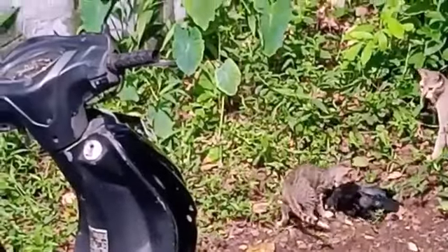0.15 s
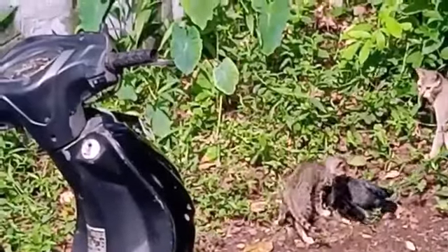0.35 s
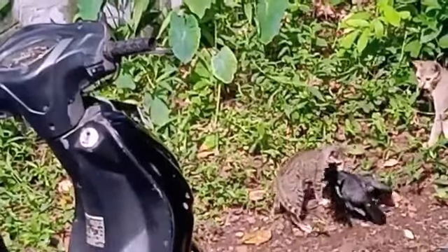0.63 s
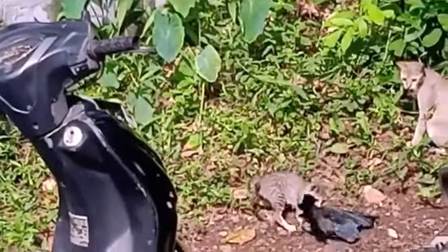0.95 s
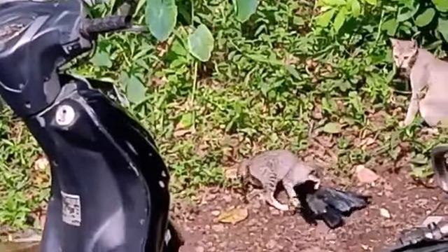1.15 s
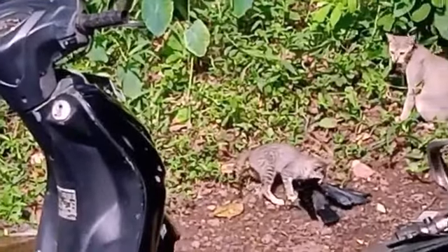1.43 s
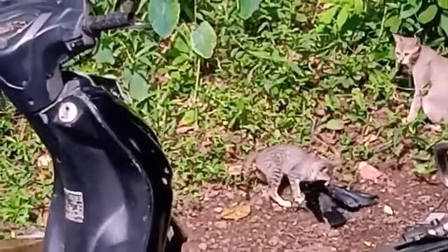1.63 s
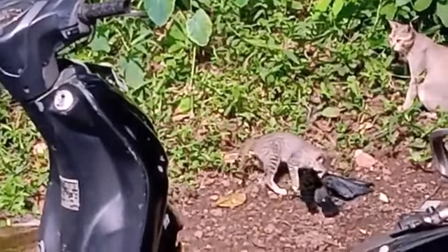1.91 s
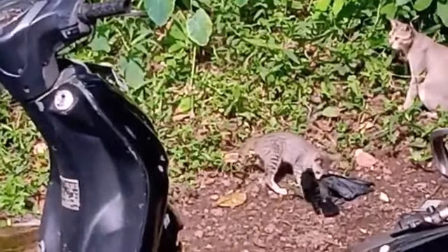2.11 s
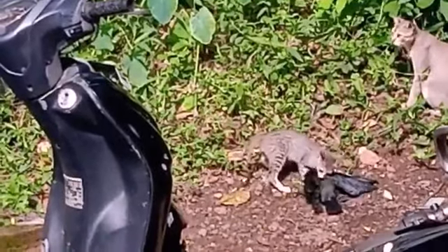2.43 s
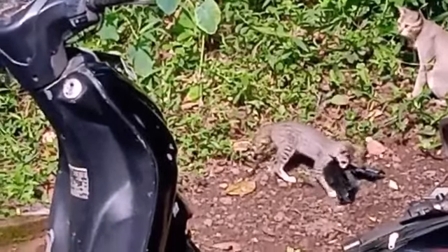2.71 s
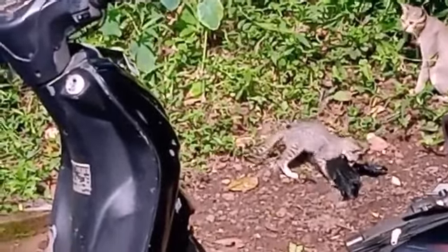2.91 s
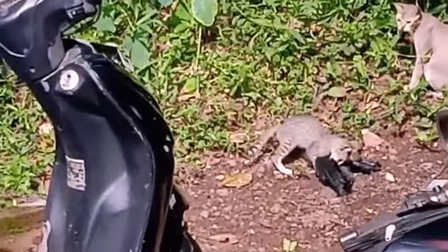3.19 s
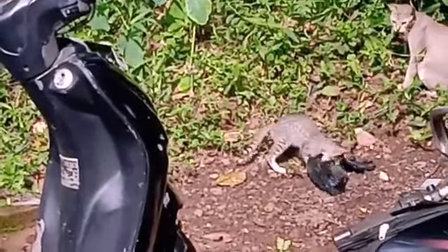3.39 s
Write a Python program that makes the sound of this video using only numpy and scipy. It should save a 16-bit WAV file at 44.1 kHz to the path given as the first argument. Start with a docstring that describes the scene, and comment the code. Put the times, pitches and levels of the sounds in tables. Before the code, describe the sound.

A mob of crows caws in a dense, raucous, overlapping clamor around an open yard.

```python
"""First a hoarse caw, already under way, then more: a mob of crows in the trees over a yard, heard on a phone.
Near caws are rattling pulse trains and breath through throat and beak; a far flock of like voices lies behind.
A dove coos faintly as wavering sine tones. Filtered noise makes street murmur and breeze, short wavering
sines the wind thumps on the microphone. Thin treble noise follows the din, its bands flickering.
"""
import sys
import numpy as np
from scipy import signal
from scipy.fft import rfft, irfft
from scipy.io import wavfile
from scipy.ndimage import uniform_filter1d, map_coordinates

SR = 44100
rng = np.random.default_rng(int(sys.argv[2]) if len(sys.argv) > 2 else 0)


def invert_db(level):
    """Linear amplitude ratio for a level in decibels (20 dB per decade), elementwise."""
    return 10 ** (np.asarray(level, dtype=float) / 20)


def master(y):
    """Save y as 16-bit WAV."""
    cut = np.clip(np.atleast_2d(y).T, -1, 1)
    pcm = np.round(cut * 32767)  # scale
    wavfile.write(sys.argv[1], SR, pcm.astype(np.int16))


N = 156555  # samples

# distant street murmur, spectrum: (f/Hz, level/dB)
MURMUR_SPECTRUM = [(71, -30), (120, -26), (204, -16.5), (414, -3), (534, -17.5), (590, -7), (900, -1),
                   (1170, -44), (1980, -120)]
# distant street murmur over time, before MURMUR_GAIN_DB and random swells: (t/s, level/dB)
MURMUR_LEVEL = [(0.0, -76), (0.49, -72), (0.67, -80.5), (1.17, -73), (1.21, -79), (1.4, -76), (1.42, -76),
                (1.88, -74), (2.0, -88), (2.13, -74), (2.72, -80), (2.88, -73.5), (3.492, -79), (3.55, -75)]
# breeze at the microphone, spectrum: (f/Hz, level/dB)
BREEZE_SPECTRUM = [(20, -36), (40, -14), (60, -15.5), (92, -1.5), (108, -1), (182, -14.5), (250, -16),
                   (320, -80), (550, -120)]
# breeze over time, before random gusts: (t/s, level/dB)
BREEZE_LEVEL = [(0.0, -80), (0.19, -76), (0.54, -91), (0.72, -89), (0.92, -82), (1.22, -79), (1.3, -80),
                (1.62, -75), (1.91, -79), (2.16, -77), (2.62, -74), (2.78, -73), (3.01, -74.5), (3.55, -77)]
# wind thumps on the microphone: (peak time t/s, peak level/dB, mean pitch f/Hz)
THUMPS = [(0.071, -67, 96), (0.29, -71, 110), (0.727, -64, 93), (0.858, -61, 78), (1.196, -58.5, 105),
          (1.309, -89, 118), (1.374, -60, 325), (1.409, -69, 295), (1.429, -65, 149), (1.498, -60, 160),
          (1.879, -76, 155), (2.009, -72, 94), (2.108, -62, 108), (2.148, -57, 114), (2.2, -48.5, 90),
          (2.336, -57, 83), (2.679, -66, 105), (2.78, -72, 71), (2.881, -71, 65), (2.979, -59, 81.7),
          (3.101, -69, 85), (3.237, -66.5, 83), (3.321, -71.5, 89), (3.42, -71, 78)]
# thin flickering treble, spectrum: (f/Hz, level/dB)
SIZZLE_SPECTRUM = [(7800, -13), (8200, -2), (9400, -1.5), (11500, -5), (12300, -13), (13400, -26),
                   (14800, -3.5), (15700, -14)]
# dove coos, before random level changes: (start t/s, length t/s, peak level/dB, mean pitch f/Hz)
COOS = [(0.085, 0.51, -66.5, 405), (2.658, 0.21, -65.5, 421)]
# the far flock over time, before the yard's echoes: (t/s, level/dB)
FLOCK_LEVEL = [(0, -38), (0.821, -40), (1.1, -42.5), (2.0, -40.5), (2.96, -45), (3.55, -43)]
# near caws: (start t/s, length t/s, level/dB before swell and echoes, pitch f/Hz at the middle,
# glide/share of pitch each side of the middle, throat f/Hz, upper throat f/Hz (both at the middle),
# treble level/dB before a common lift, roughness/0-1)
NEAR_CAWS = [(-.2, 0.33, -41.5, 475.4, 0.0095, 1920, 4520, -1, 0.42),
             (0.101, 0.31, -44.5, 460.6, .02, 1580, 4370, 7.5, 0.23),
             (.1, 0.32, -43.5, 536.7, -0.0046, 1780, 4640, 7, 0.45),
             (0.101, 0.23, -45.5, 483, 0.026, 2090, 4700, -4, 0.25),
             (0.201, 0.15, -36, 515, .03, 2040, 4500, -16, 0.21),
             (0.356, 0.3, -54, 495, -0.0039, 1990, 4200, -6, 0.26),
             (.58, 0.27, -37, 481.2, 0.019, 1800, 4550, 1, 0.35),
             (0.615, 0.28, -51.5, 474, .01, 1420, 4600, -30, 0.3),
             (0.66, 0.43, -43, 518, 0.0016, 1930, 4810, 2.5, 0.28),
             (1.06, 0.28, -45, 540, -0.028, 1600, 4330, -6, 0.2),
             (1.239, 0.33, -37.5, 485.2, -0.0097, 1746, 4540, 2, 0.48),
             (1.297, 0.31, -46, 437.7, .01, 1570, 4570, 5.5, 0.37),
             (1.619, 0.23, -41.5, 519.7, -0.011, 1654, 4660, -1.5, 0.28),
             (1.661, 0.32, -42, 514.7, -0.01, 2090, 4760, -6, 0.22),
             (1.72, 0.31, -41, 477.3, -0.006, 2025, 4460, 1.5, 0.32),
             (1.937, 0.26, -47, 456.6, -0.013, 1410, 4700, 12.5, 0.12),
             (1.95, 0.257, -44.5, 432, -0.0054, 1740, 4330, 0, 0.28),
             (2.271, 0.32, -41.5, 475.2, -0.024, 1776, 4200, -5.5, 0.35),
             (2.519, 0.26, -44, 497.4, -0.017, 2065, 4300, 2, 0.4),
             (2.46, 0.31, -52.5, 489, 0, 1500, 4700, 13, 0.08),
             (2.737, 0.18, -42.5, 497, 0, 2010, 4300, -1, 0.28),
             (2.856, 0.24, -49.5, 494, -.02, 2100, 4840, -9, 0.39),
             (3.121, 0.28, -41.5, 477, -0.024, 1885, 4500, 3, 0.25),
             (3.059, 0.28, -48.5, 481, -.015, 1450, 4550, -1.5, 0.18),
             (3.357, 0.29, -46.5, 505, .02, 2170, 4340, 3.5, 0.56)]
# throat, beak and microphone together: (f/Hz, level/dB)
VOICE_SPECTRUM = [(150, -80), (290, -48), (500, -35.5), (680, -22.5), (800, -10.5), (960, -11),
                  (1240, -7.5), (1400, -7), (1750, -2.5), (2080, -4.5), (2250, -7), (2550, -17),
                  (2950, -23.5), (3550, -30.5), (3900, -26.5), (4200, -26), (5320, -25), (6060, -26),
                  (7310, -26.5), (7700, -32.5), (8100, -75)]
# what differs between the microphone ports, before random level changes: (f/Hz, level/dB)
PORT_SPECTRUM = [(60, -23), (110, -23), (200, -16), (380, -27.5), (700, -26.5), (1290, -30), (2380, -28.5),
                 (4400, -23), (8120, -20.5), (15000, -18)]

MURMUR_GAIN_DB = 9  # whole band over its lower part
THUMP_S = 0.013  # from the peak to 1/e
SIZZLE_DB, SIZZLE_BAND_HZ, DROPOUT_DB, DROPOUT_BIAS = -68, 250, -40, .3
TOP_FLICKER_HZ, TOP_FADE_PER_S = 11900, .3  # above this, bands drop out together, ever more often
ATTACK_S, RELEASE_S = 0.056, 0.063
PITCH_SAG, JITTER = .05, .025  # shares of pitch: sag at both ends; fast jitter at full roughness
RATTLE_HZ, RATTLE_DEPTH = 80, .55  # mean rate
THROAT_WIDTH_HZ, THROAT_DB = 240, 13
UPPER_WIDTH_HZ, UPPER_DB = 130, 16
BEAK_HZ, BEAK_WIDTH_HZ, BEAK_DB = 6140, 570, 0
TREBLE_HZ = 3300  # crossover between the low and the high part of the voice
FLOCK_PER_S, FLOCK_SPREAD_DB = 24, 3.5  # spread each way
FLOCK_BLUR_DB = -6  # far throats ring less sharply
YARD_T60_S, YARD_DB, FLOCK_YARD_DB = 0.63, -7.5, 1.5  # echoes relative to direct sound
PORT_SMEAR_S = .08  # T60
TOP_HZ = 15700


def level(x, db):
    """Set the rms level in dB."""
    return x * invert_db(db) / np.sqrt(np.mean(x ** 2))


def colour(x, points):
    """Filter by a (f/Hz, level/dB) curve, straight over log frequency."""
    hz = np.maximum(np.arange(len(x) // 2 + 1) * SR / len(x), 1)
    point_hz, point_db = np.transpose(points)
    gain = invert_db(np.interp(np.log(hz), np.log(point_hz), point_db))
    return irfft(rfft(x) * gain, len(x))


def over_time(points):
    """Join (t/s, level/dB) points by straight lines, in dB."""
    point_s, point_db = np.transpose(points)
    return np.interp(np.arange(N) / SR, point_s, point_db)


def walk(rate, n=N):
    """Random levels held 1 / rate s and slewed twice; spread near 1."""
    hold = max(int(SR / rate), 1)
    steps = np.repeat(rng.standard_normal(n // hold + 1), hold)
    return 1.3 * uniform_filter1d(uniform_filter1d(steps, hold), hold)[:n]


def add(out, x, start):
    """Mix x in at start seconds, trimmed to the scene."""
    i = int(start * SR)
    a, b = max(i, 0), min(i + len(x), N)
    if b > a:
        out[a:b] += x[a - i:b - i]


def swell(t, length):
    """Gain of one call as it rises and dies away."""
    return np.clip(np.minimum(t / ATTACK_S, (length - t) / RELEASE_S), 0, 1) ** 2


def echoes(x, t60_s):
    """Scattered reflections: a decaying noise tail with unit energy."""
    t = np.arange(SR // 2) / SR
    tail = rng.standard_normal(len(t)) * np.exp(-np.log(1000) * t / t60_s)
    return signal.fftconvolve(x, tail / np.sqrt(np.sum(tail ** 2)))[:N]


def yard(x, db):
    """Echoes of trees and walls beside the direct sound, scaled to keep the power."""
    return (x + invert_db(db) * echoes(x, YARD_T60_S)) / np.sqrt(1 + invert_db(db) ** 2)


def street_murmur():
    """Distant, patchy murmur: low-passed noise whose level wanders."""
    noise = level(colour(rng.standard_normal(N), MURMUR_SPECTRUM), MURMUR_GAIN_DB)
    return noise * invert_db(over_time(MURMUR_LEVEL) + 3.6 * walk(15))


def breeze():
    """Fitful wind at the microphone: very low noise in gusts."""
    noise = level(colour(rng.standard_normal(N), BREEZE_SPECTRUM), 0)
    return noise * invert_db(over_time(BREEZE_LEVEL) + 4.5 * walk(25))


def wind_thumps():
    """Single thumps of wind on the microphone: wavering sines in short bell-shaped bursts."""
    out = np.zeros(N)
    t = np.arange(SR // 5) / SR
    bell = np.exp(-(t / THUMP_S - 2) ** 2)
    for start, db, hz in THUMPS:
        turns = np.cumsum(hz * (1 + .1 * walk(60, len(t)))) / SR + rng.random()
        add(out, invert_db(db) * bell * np.sin(2 * np.pi * turns), start - 2 * THUMP_S)
    return out


def sizzle(crows):
    """Narrow treble bands follow the din and drop out briefly, the lower ones each by itself."""
    out = np.zeros(N)
    din = np.sqrt(uniform_filter1d(crows ** 2, SR // 10) + 1e-12)
    together = walk(28)
    fade = TOP_FADE_PER_S * np.arange(N) / SR
    for hz in np.arange(7800, TOP_HZ, SIZZLE_BAND_HZ):
        end_hz = hz + SIZZLE_BAND_HZ
        edges = [(hz - 30, -90), (hz, 0), (end_hz, 0), (end_hz + 30, -90)]
        band = colour(rng.standard_normal(N), edges)
        if hz < TOP_FLICKER_HZ:
            chance = walk(25)
        else:
            chance = together + .4 * walk(25) + fade
        dropout = np.clip(3 * (chance - DROPOUT_BIAS), 0, 1)
        out += band * invert_db(DROPOUT_DB * dropout)
    return level(colour(out, SIZZLE_SPECTRUM) * din ** 1.13, SIZZLE_DB)


def dove():
    """Soft, faint coos: sine tones that waver in pitch and level."""
    out = np.zeros(N)
    t = np.arange(SR // 2) / SR
    for start, length, db, hz in COOS:
        tone = np.sin(2 * np.pi * np.cumsum(hz * (1 + .015 * walk(30, len(t)))) / SR)
        add(out, invert_db(db + 3 * walk(30, len(t))) * tone * swell(t, length), start)
    return out


def resonance(f, centre_hz, width_hz):
    """Power-shaped peak of unit height; width at half height."""
    return 1 / (1 + (2 * (f - centre_hz) / width_hz) ** 2)


def voice_source(n, pitch_hz, rough):
    """Uneven pulses of 30 harmonics, mixed with breath noise gated by the same cycle."""
    wander = JITTER * rough * walk(400, n) + .016 * walk(30, n)
    phase = 2 * np.pi * np.cumsum(pitch_hz * (1 + wander)) / SR
    k = np.arange(1, 31)[:, None]
    pulses = level(np.cos(k * phase + 0.1511 * k ** 2).sum(axis=0), 0)
    hiss = level(rng.standard_normal(n) * (1 + 0.51 * np.cos(phase)), 0)
    return np.sqrt(1 - rough) * pulses + np.sqrt(rough) * hiss


def throat_rattle(n):
    """Slow, uneven beating of the voice's loudness."""
    rate = RATTLE_HZ * (1 + 0.159 * rng.standard_normal() + .12 * walk(61.4, n))
    return 1 + RATTLE_DEPTH * np.cos(2 * np.pi * np.cumsum(rate) / SR)


def caw(length, db, pitch_hz, glide, throat_hz, upper_hz, treble_db, rough, blur_db=0):
    """Rattling pulses and breath ring the throat and beak; pitch and resonances arch together."""
    n = 20480
    t = np.arange(n) / SR
    source, rattle = voice_source(n, pitch_hz, rough), throat_rattle(n)
    f = np.arange(1, n // 2 + 2) * SR / n
    throat = invert_db(THROAT_DB + blur_db) * resonance(f, throat_hz, THROAT_WIDTH_HZ)
    upper = invert_db(UPPER_DB + 2 * blur_db) * resonance(f, upper_hz, UPPER_WIDTH_HZ)
    beak = invert_db(BEAK_DB) * resonance(f, BEAK_HZ, BEAK_WIDTH_HZ)
    low = (1 + throat) / (1 + (f / TREBLE_HZ) ** 8)
    high = (1 + upper + beak) / (1 + (TREBLE_HZ / f) ** 8) * invert_db(treble_db + 5.5)
    # the treble rattles less deeply than the low part
    x = irfft(rfft(source * rattle) * low + rfft(source * np.sqrt(rattle)) * high, n)
    along = np.minimum(2 * t / length - 1, 1.5)  # -1 at the start, 1 at the end
    speed = 1 + glide * along - PITCH_SAG * along ** 4
    arched = map_coordinates(x, [np.cumsum(speed)], mode="wrap")
    return level(colour(arched, VOICE_SPECTRUM), db) * swell(t, length)


def flock():
    """Many far crows, loosely taking turns, blurred by strong echoes."""
    out = np.zeros(N)
    for i in range(int(FLOCK_PER_S * (N / SR + .4))):
        r = rng.random(8)
        x = caw(length=.2 + 0.1471 * r[0], db=FLOCK_SPREAD_DB * 2 * (r[1] - .5),
                pitch_hz=430 + 110 * r[2], glide=.05 * (r[7] - .6),
                throat_hz=1600 + 500 * r[3], upper_hz=4000 + 1000 * r[4],
                treble_db=-2 + 3 * r[5], rough=0.362, blur_db=FLOCK_BLUR_DB)
        add(out, x, (i + r[6]) / FLOCK_PER_S - .4)
    return yard(level(out, 0) * invert_db(over_time(FLOCK_LEVEL)), FLOCK_YARD_DB)


def near_crows():
    """The nearest caws, which stand out of the flock, with weaker echoes."""
    out = np.zeros(N)
    for start, *settings in NEAR_CAWS:
        add(out, caw(*settings), start)
    return yard(out, YARD_DB)


def microphone_ports(mid):
    """Two channels: a smeared, flickering difference is added to one port and taken from the other."""
    side = colour(echoes(mid, PORT_SMEAR_S), PORT_SPECTRUM) * invert_db(6.1 * walk(30.08))
    return mid + side * np.array([[1], [-1]])


def scene():
    """Yard, dove and crows together at the two microphone ports."""
    background = street_murmur() + breeze() + wind_thumps()
    crows = flock() + near_crows()
    return microphone_ports(background + sizzle(crows) + dove() + crows)


def roll_off(x):
    """The treble ends steeply here."""
    return signal.sosfilt(signal.butter(12, 16510, fs=SR, output="sos"), x)


def record(dry):
    """The phone cuts the top with a steep low-pass."""
    low_pass = signal.ellip(8, .2, 70, TOP_HZ, fs=SR, output="sos")
    mix = signal.sosfilt(low_pass, dry)
    return roll_off(mix)


dry = scene()
out = record(dry)
master(out)
```